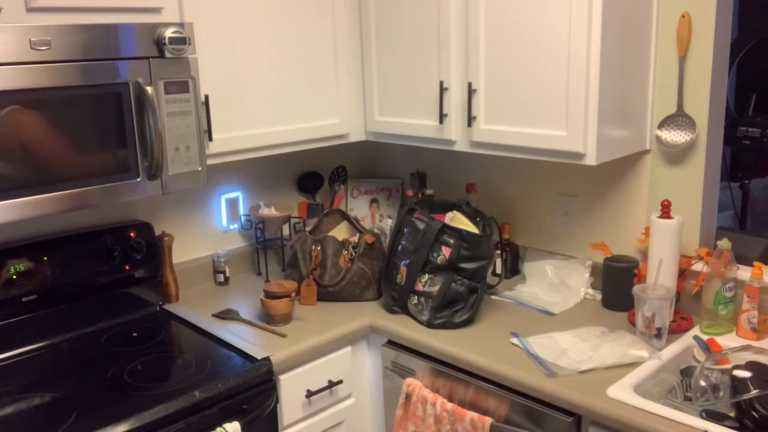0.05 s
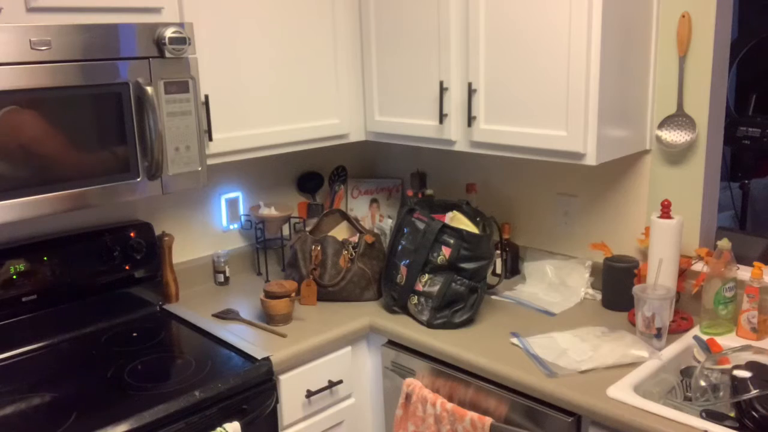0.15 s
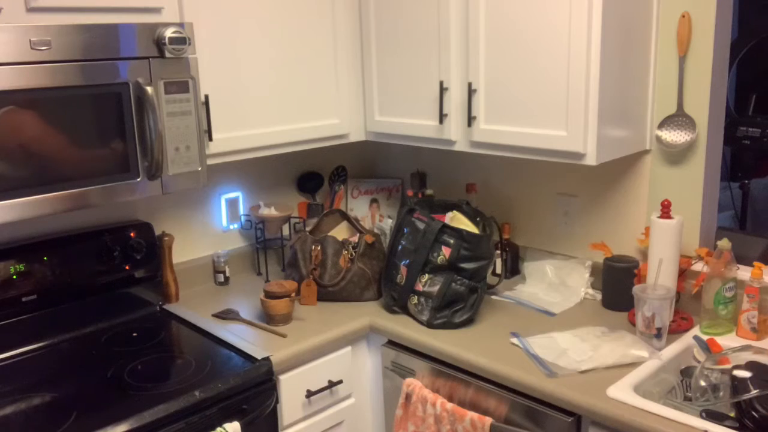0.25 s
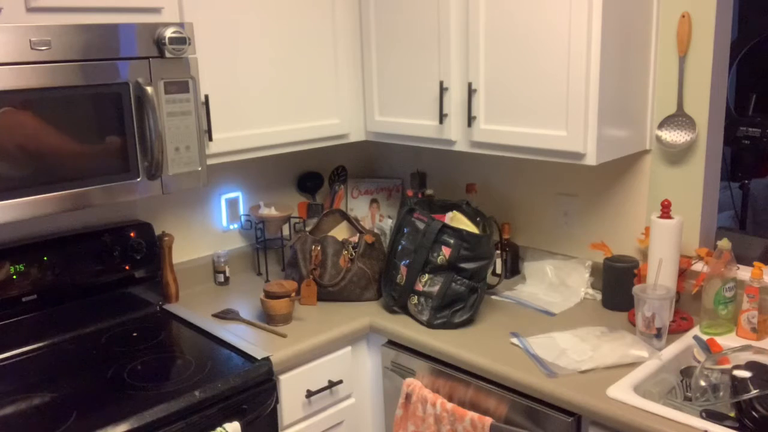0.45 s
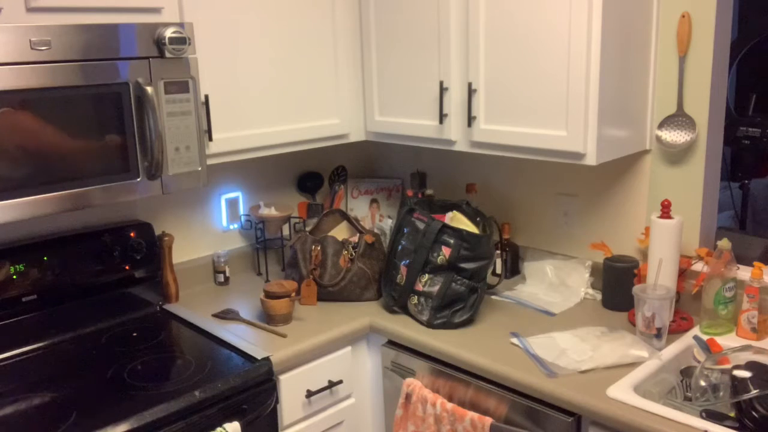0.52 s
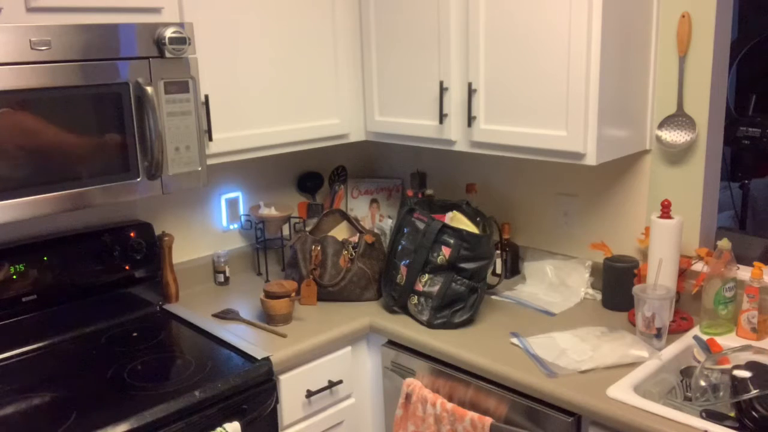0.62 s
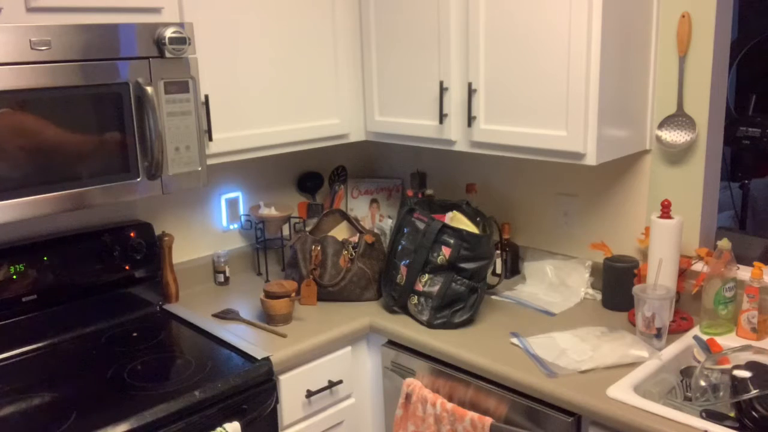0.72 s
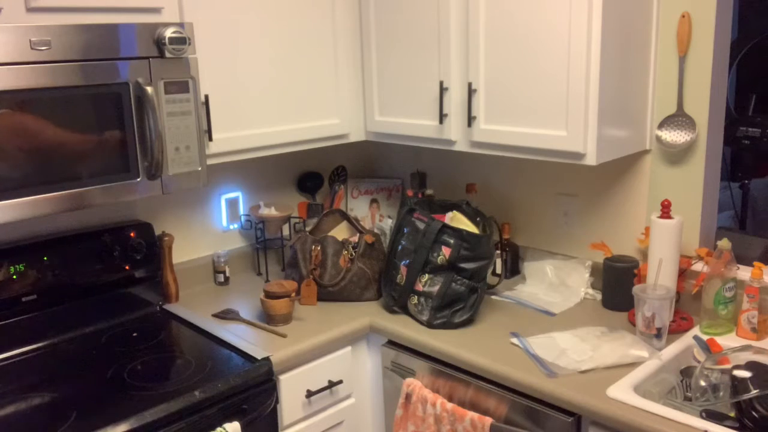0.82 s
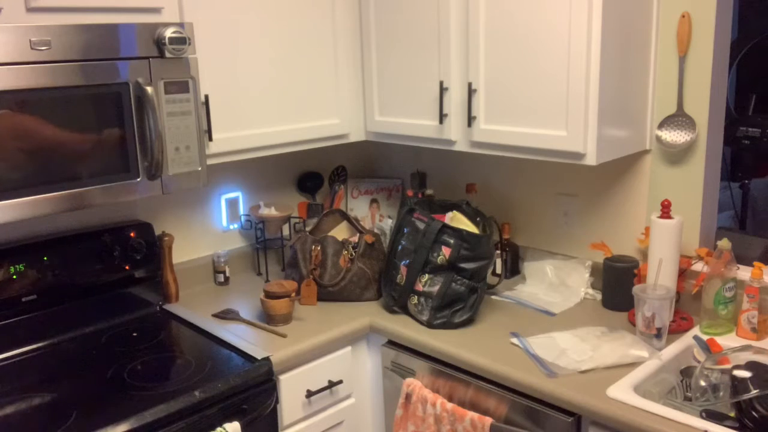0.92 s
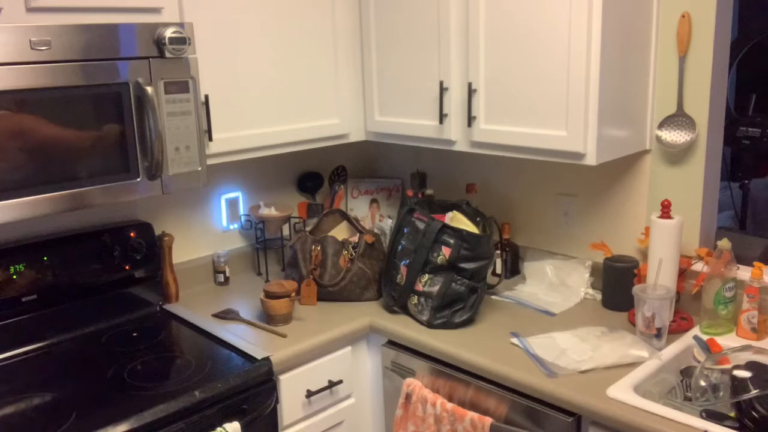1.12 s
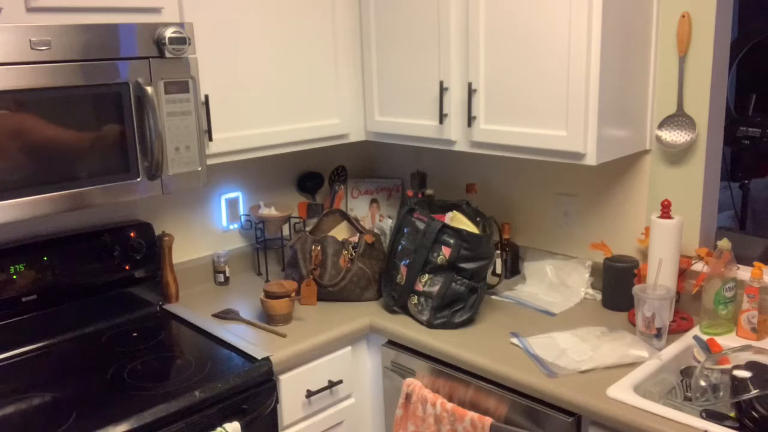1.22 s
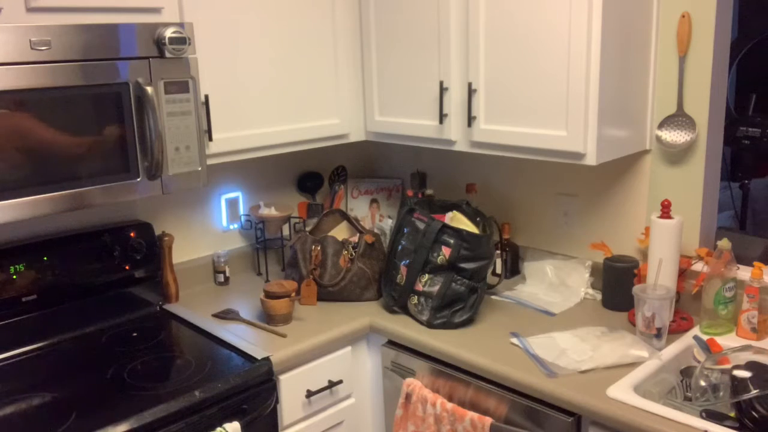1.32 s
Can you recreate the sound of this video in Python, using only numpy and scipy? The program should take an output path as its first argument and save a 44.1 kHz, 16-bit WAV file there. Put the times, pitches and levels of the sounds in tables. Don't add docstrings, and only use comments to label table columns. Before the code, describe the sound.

A metal pan strikes a sink basin with one hard, rebounding clank as an earlier blow's ring fades, then soft ticks and rubs; small kitchen, close stereo microphone, pan off to the left.

```python
import sys
import numpy as np
from scipy import signal
from scipy.fft import rfft, irfft, next_fast_len
from scipy.io import wavfile
from scipy.ndimage import uniform_filter1d, map_coordinates

SR = 44100
rng = np.random.default_rng(int(sys.argv[2]) if len(sys.argv) > 2 else 0)


def boost(x):
    u = np.asarray(x, float) / 20
    return 10 ** u


def generate_wav(sig):
    pcm = np.round(np.clip(np.atleast_2d(sig).T, -1, 1) * 32767).astype(np.int16)
    wavfile.write(sys.argv[1], SR, pcm)


N = 59535
LEAD = SR // 4


def unit(x):
    return x / np.sqrt(np.mean(x ** 2) + 1e-20)


def along(points, hz):
    f, v = np.transpose(points)
    return np.interp(np.log(hz + 1), np.log(f + 1), v)


def over_time(points):
    return np.interp(np.arange(N) / SR, *np.transpose(points))


def wobble(rate):
    knots = rng.standard_normal(int(N * rate / SR) + 4)
    return map_coordinates(knots, [np.arange(N) * rate / SR])


def filtered(x, response):
    size = next_fast_len(x.shape[-1] + SR // 4)
    spectrum = rfft(x, size) * response(np.fft.rfftfreq(size, 1 / SR))
    return irfft(spectrum, size)[..., :x.shape[-1]]


def add(track, start_s, sound):
    part = track[LEAD + round(start_s * SR):][:len(sound)]
    part += sound[:len(part)]


def ring(modes, t):
    hz, db, t60 = np.transpose(modes)[:, :, None]
    phase = 2 * np.pi * rng.random(hz.shape)
    sines = boost(db - 60 * t / t60) * np.sin(2 * np.pi * hz * t + phase)
    return sines.sum(0) * (1 - np.exp(-t / 0.00029))


# frequency in Hz, t60 in seconds.
ROOM_T60 = [(200, .25), (700, 0.62), (2000, 0.53), (6000, 0.47), (9000, 0.17), (14000, 0.14)]


def room(x, wet_db):
    hz, t, z = signal.stft(rng.standard_normal((2, SR * 3 // 5)), SR, nperseg=256)
    decay = boost(-60 * t / along(ROOM_T60, hz)[:, None])
    tail = signal.istft(z * decay, SR, nperseg=256)[1]
    rise_s = 0.00087
    tail = tail * (1 - np.exp(-np.arange(tail.shape[1]) / SR / rise_s))
    tail = tail / np.linalg.norm(tail[0])
    wet = signal.fftconvolve(x[None], tail, axes=1)[:, :len(x)]
    direct = x * [[1], [.3]]
    return (direct + boost(wet_db) * wet)[:, LEAD:]


# frequency in Hz, level in dB.
BASIN_COLOUR = [(130, -43), (300, -14), (450, -27), (1000, -2), (2000, -6.5), (4500, -10), (7000, -9),
                (15000, -17.5)]
# frequency in Hz, t60 in seconds.
BASIN_DECAY = [(300, 0.039), (1500, 0.053), (6000, 0.07)]


def clatter(t):
    t = t[:SR // 8]
    hz = np.exp(rng.uniform(np.log(200), np.log(14000), size=90))
    scatter_db = 4 * rng.standard_normal(len(hz))
    crowd = ring(np.c_[hz, along(BASIN_COLOUR, hz) + scatter_db, along(BASIN_DECAY, hz)], t)
    noise = unit(filtered(rng.standard_normal(len(t)), lambda f: boost(along(BASIN_COLOUR, f))))
    crack_t60 = 0.017
    crack = noise * boost(-60 * t / crack_t60)
    return crack + boost(-5) * crowd / 2


PAN_MODES_HZ = [684, 765, 842, 1041, 1077, 1197, 1511, 1542, 1943, 2314, 2597, 3182, 4110, 5160]
# level in dB, t60 in seconds.
EARLIER_STRIKE = [(-8.5, .22), (-35, .2), (-27, .1), (-4.5, 0.39), (-25.5, 0.16), (-20.5, .15), (-17.5, .2),
                  (-7, 0.19), (-10.5, 0.17), (-25.5, 0.085), (-6.5, 0.083), (-25.5, .1), (-23.5, 0.091),
                  (-30.5, .1)]
# level in dB, t60 in seconds.
HARD_STRIKE = [(-1.5, 0.45), (-13.5, 0.41), (0, .12), (3, 0.23), (-12.5, .5), (-0.5, .12), (-4.5, 0.23),
               (2.5, 0.45), (-13, 0.22), (-2, .06), (-30, .2), (1, 0.096), (2.5, 0.067), (1, 0.051)]
# frequency in Hz, level in dB, t60 in seconds.
BASIN_BOOM = [(231.7, -12.5, 0.18), (300.6, -5, .16), (334.7, -3.5, 0.13), (555, -11, 0.097),
              (4530, -11.5, 0.35), (5970, -13, .1), (6610, -14, 0.16)]
# start in seconds, ring level in dB, crack level in dB.
CONTACTS = [
    (.2040, -38, -29.5),
    (0.2086, -31.5, -28.5),
    (.2120, -32, -24),
    (.2230, -37.5, -29),
    (.2440, -37.5, -30.5),
]


def pan():
    rings, rattle = np.zeros(N + LEAD), np.zeros(N + LEAD)
    t = np.arange(SR // 2) / SR
    split = 1 + .02 * rng.uniform(.4, 1, size=len(PAN_MODES_HZ))
    twin_db = -5.5
    earlier = (-0.043, -30, -37, EARLIER_STRIKE)
    for start_s, ring_db, crack_db, strike in [earlier] + [(*contact, HARD_STRIKE) for contact in CONTACTS]:
        modes = np.c_[PAN_MODES_HZ, strike]
        twins = np.c_[modes[:, 0] * split, modes[:, 1] + twin_db, modes[:, 2]]
        boom_db = -8.5 if start_s < 0 else 0
        boom = np.add(BASIN_BOOM, [0, boom_db, 0])
        add(rings, start_s, boost(ring_db) * ring(np.r_[modes, twins, boom], t))
        add(rattle, start_s, boost(crack_db) * clatter(t))
    return room(rings, -8.5) + room(rattle, 0.5)


# frequency in Hz, level in dB.
RUMBLE_COLOUR = [(25, -26), (60, -2), (110, -2), (250, -1), (450, -14), (700, -25), (1400, -28),
                 (2500, -32.5)]
# frequency in Hz, level in dB.
HISS_COLOUR = [(1000, -8), (3200, -1), (4500, -1), (6300, -5), (7800, 2), (9600, 4), (13000, 1),
               (14800, -7.5)]
# time in seconds, level in dB.
RUMBLE_LEVEL = [(0, 7.5), (.5, 2.5), (.9, 0.5), (1.2, 2), (1.35, -2)]
# time in seconds, level in dB.
MOTOR_LEVEL = [(0, -82.5), (.4, -77), (.65, -58.5), (.9, -56), (1.08, -61), (1.25, -77), (1.35, -90)]


def background():
    z = signal.stft(rng.standard_normal((2, N)), nperseg=1024)[2]
    field = uniform_filter1d(rng.standard_normal(z.shape[1:]), size=3, axis=0)
    field = uniform_filter1d(field, size=6, axis=1)
    patchy_db = 3 * unit(field)
    patchy = signal.istft(z * boost(patchy_db), nperseg=1024)[1][:, :N]
    rumble_points = [(6.6, -57)] + RUMBLE_COLOUR + [(5000, -70)]
    rumble = unit(filtered(patchy, lambda f: boost(along(rumble_points, f))))
    hiss_points = [(300, -46)] + HISS_COLOUR
    hiss = unit(filtered(rng.standard_normal((2, N)), lambda f: boost(along(hiss_points, f))))

    t = np.arange(N) / SR
    mains_hz, motor_hz = 60.4, 146.6
    mains = boost(-66.5 + 4 * wobble(24)) * np.sin(2 * np.pi * mains_hz * t + .3 * wobble(6))
    motor_db = over_time(MOTOR_LEVEL) + 0.9 * wobble(8.6)
    motor = boost(motor_db) * np.sin(2 * np.pi * motor_hz * t + .2 * wobble(24))
    tones = (mains + motor) * [[1.4], [0]]
    return boost(-61.5 + over_time(RUMBLE_LEVEL)) * rumble + boost(-76.5) * hiss + tones


def band(size, hz, octaves):
    def flat_top(f):
        return np.exp(-.5 * (np.log2((f + 1) / hz) / octaves) ** 4)
    return unit(filtered(rng.standard_normal(size), flat_top))


# start in seconds, level in dB, centre in Hz, width in octaves, t60 in seconds.
HANDLING_TICKS = [
    (.4194, -52, 8530, 0.16, 0.21),
    (0.42, -70, 12400, 0.17, 0.39),
    (.6464, -62, 3070, 0.36, 0.22),
    (.665, -70, 4830, 0.05, 0.11),
    (.66, -59.5, 2050, 0.15, 0.13),
    (.751, -57, 1320, 0.68, 0.23),
    (.7774, -57, 6900, 0.59, 0.014),
    (.7774, -72, 13100, .08, 0.0051),
]
# start in seconds, length in seconds, level in dB, centre in Hz, width in octaves.
SOFT_RUBS = [
    (0.501, 0.097, -68.5, 6300, 0.24),
    (0.774, 0.13, -78, 6170, 0.11),
    (0.794, 0.0725, -79.5, 3280, 0.21),
    (0.898, 0.068, -84.5, 1454, 0.19),
    (1.049, 0.039, -81.5, 1601, 0.59),
    (1.196, 0.035, -83.5, 1523, 0.38),
    (.64, 0.043, -70.5, 5400, 0.34),
    (0.678, .2, -68, 309, 0.056),
    (0.899, .24, -62.5, 267, 0.067),
]


def handling():
    out, t = np.zeros(N + LEAD), np.arange(SR // 3) / SR
    rise_s = 0.00071
    for start_s, db, hz, octaves, t60 in HANDLING_TICKS:
        shape = boost(db - 60 * t / t60) * (1 - np.exp(-t / rise_s))
        add(out, start_s, shape * band(len(t), hz, octaves))
    for start_s, length_s, db, hz, octaves in SOFT_RUBS:
        shape = np.sqrt(np.sin(np.pi * np.clip(t / length_s, 0, 1)).clip(0))
        grains = boost(db + 1.4 * wobble(120)[:len(t)])
        add(out, start_s, grains * shape * band(len(t), hz, octaves))
    return room(out, -6)


def scene():
    return pan() + background() + handling()


def roll_off(x):
    return signal.sosfilt(signal.butter(12, 14980, fs=SR, output="sos"), x)


# frequency in Hz, dB below the left port.
RIGHT_WEAKER = [(50, 10.5), (300, 1.5), (720, 2.5), (1400, 14.5), (3000, 10), (5800, 5.5), (6800, 0.5),
                (7600, 2)]
# frequency in Hz, likeness from 0
LIKENESS = [(60, 0.42), (150, .95), (300, 0.82), (700, .95), (1100, 0.77), (2000, .3), (5000, .45),
            (6700, 0.27),
            (7700, 1), (9200, 1), (10300, .65), (11300, .75), (11800, 1), (13400, 1), (14200, .5),
                (15000, .9)]
# frequency in Hz, phase in radians.
PHASE = [(60, 1.5), (150, 4), (330, 0.95), (500, 0), (690, -2), (800, -1.5), (1050, -4.5), (2300, -8.8)]
# frequency in Hz, phase in half turns.
PHASE_TOP = [(3300, -2), (5000, -1.5), (6500, -1.35), (7700, -1), (9200, -1), (11500, 0), (13400, 0),
             (15000, 1)]
# frequency in Hz, level in dB.
MIC_COLOUR = [(6700, 0.5), (7300, 0), (7800, -14), (8700, -5.5), (9700, -5.5), (11300, -13.5),
              (13200, -2.5), (15000, -15)]


def record(dry):
    phase_points = PHASE + [(hz, np.pi * half_turns) for hz, half_turns in PHASE_TOP]

    def right_port(f):
        alike = np.clip(along(LIKENESS, f), 0, 1)
        shared = alike * np.exp(1j * along(phase_points, f))
        own = np.sqrt(1 - alike ** 2)
        return boost(-along(RIGHT_WEAKER, f)) * [shared, own]

    def microphone(f):
        return boost(along(MIC_COLOUR, f)) * (f < 15000)

    right = filtered(dry, right_port).sum(0)
    pair = filtered(np.array([dry[0], right]), microphone)
    return roll_off(pair)


dry = scene()
out = record(dry)
generate_wav(out)
```